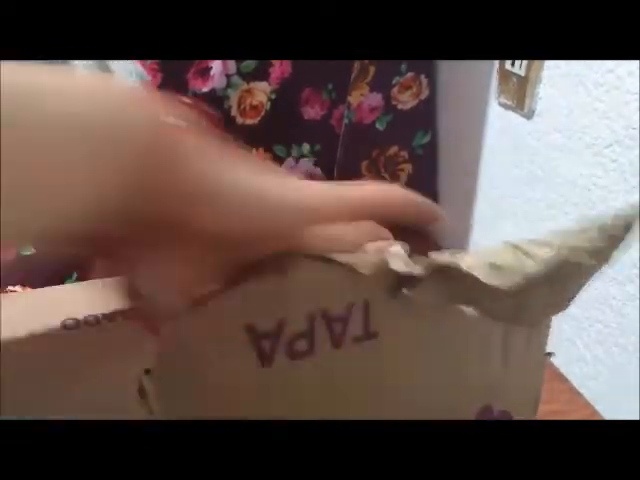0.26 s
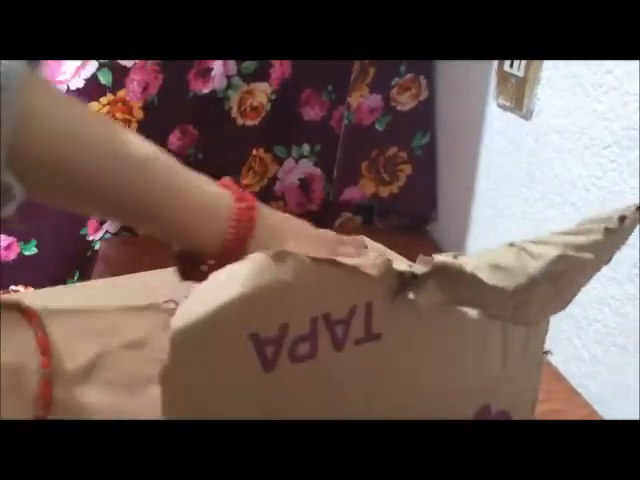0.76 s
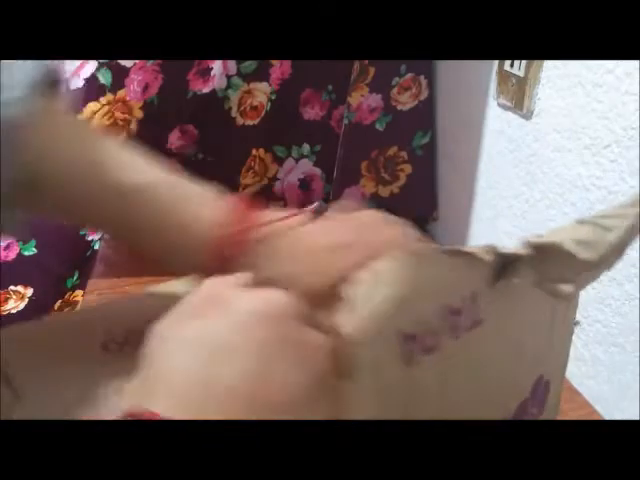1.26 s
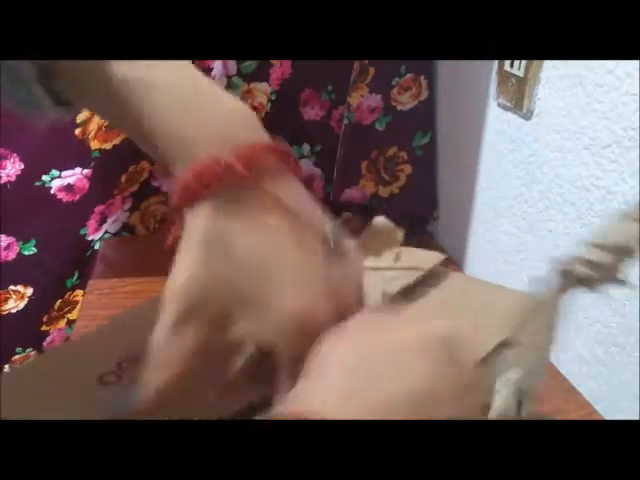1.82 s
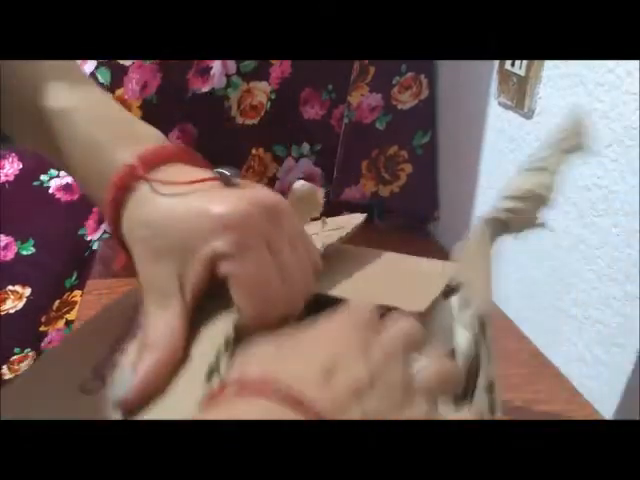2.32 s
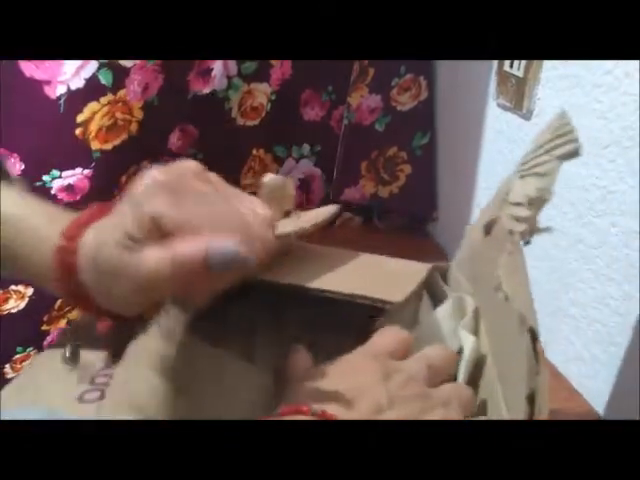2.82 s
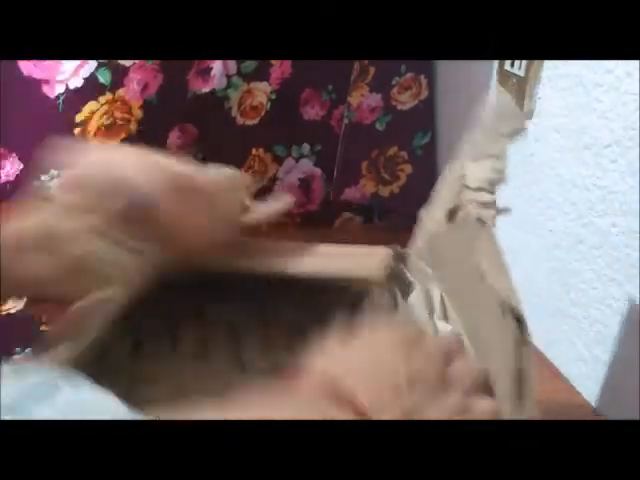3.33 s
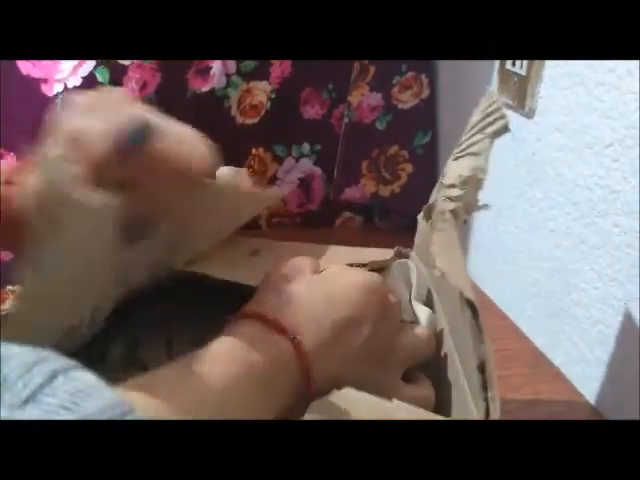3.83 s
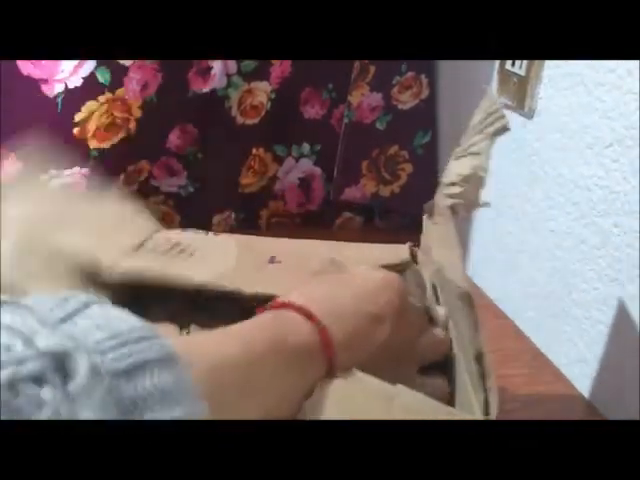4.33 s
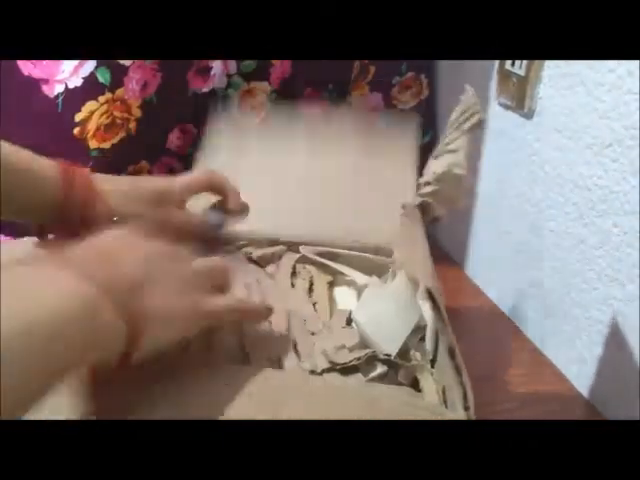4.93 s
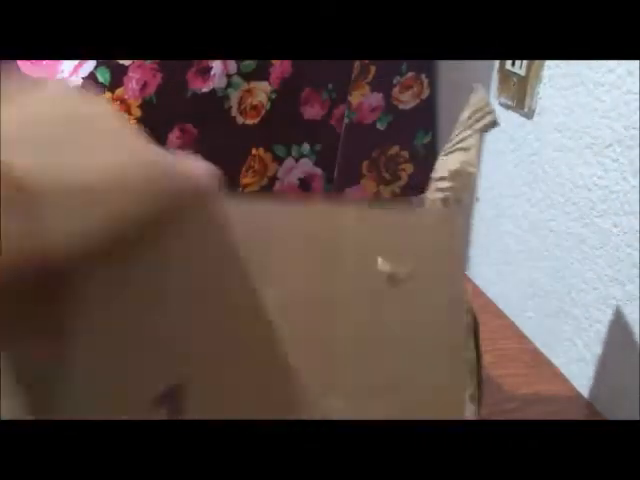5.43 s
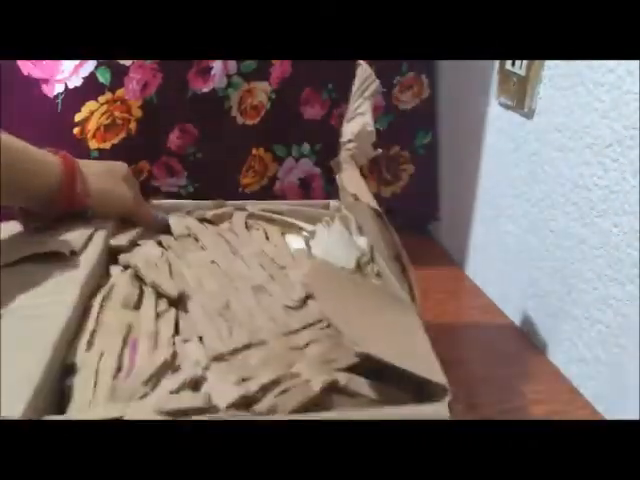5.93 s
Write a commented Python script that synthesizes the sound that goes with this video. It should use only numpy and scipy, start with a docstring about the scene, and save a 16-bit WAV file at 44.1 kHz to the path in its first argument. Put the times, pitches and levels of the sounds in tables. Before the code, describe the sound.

Close cardboard handling indoors: rough rubbing and crackling tears, a few hard snaps and boxy knocks, then softer rustling and one late click.

```python
"""Hands pull a torn cardboard box open on a table in a small room, close to a phone.
Skin and flaps slide over the board: coloured stick-slip noise that swells and fades.
Fibres and creases give way in short rips and snaps: brief bursts of filtered noise.
Flaps knock as a few swings of a panel, and the hollow box booms as a set of decaying modes.
Quiet room air and reflections lie behind; the phone widens its two microphones into stereo."""
import sys
import numpy as np
from scipy import signal
from scipy.fft import rfft, irfft, next_fast_len
from scipy.io import wavfile
from scipy.ndimage import uniform_filter1d

SR = 44100
rng = np.random.default_rng(int(sys.argv[2]) if len(sys.argv) > 2 else 0)


def master(y):
    """Save y as 16-bit WAV."""
    cut = np.clip(np.atleast_2d(y).T, -1, 1)
    pcm = np.round(cut * 32767)  # scale
    wavfile.write(sys.argv[1], SR, pcm.astype(np.int16))


N = 271637

# A hand or flap slides over the board: [t of the hardest push/s, swell/s, fade/s,
# flexing of the box level/dB, drag on the panels level/dB, surface hiss level/dB,
# brightness (sheen relative to hiss)/dB]
STROKES = [ (0.081, 0.16, 0.24, -52.5, -52.5, -55, -18), (0.262, 0.096, 0.065, -49.5, -48.5, -50, 1.5),
           (0.389, 0.039, 0.065, -46, -46.5, -53.5, 1.5), (0.53, 0.055, 0.055, -49.5, -57, -60.5, 3),
           (0.62, 0.11, 0.068, -46.5, -43.5, -51, -5.5), (0.81, 0.17, .14, -43.5, -53, -56.5, 3),
           (0.982, 0.059, 0.071, -37.5, -40, -45.5, 1), (1.17, .06, 0.043, -51, -59, -56, -10),
           (1.252, 0.068, 0.089, -41.5, -45, -48, -7), (1.39, 0.21, .06, -47.5, -47.5, -50, -0.5),
           (1.632, 0.14, 0.13, -37.5, -47, -51, -5.5), (1.91, 0.06, 0.05, -42.5, -52, -56, -1),
           (1.98, 0.047, 0.044, -47.5, -50, -55.5, -6), (2.21, 0.095, 0.066, -39, -44, -51.5, -2.5),
           (2.39, .09, .16, -47, -48, -53, -4.5), (2.62, 0.23, 0.13, -53, -56.5, -63, -2),
           (2.77, 0.17, 0.095, -51, -51.5, -58, 8), (2.848, 0.075, 0.039, -41, -40.5, -54.5, 8.5),
           (3.11, 0.065, 0.057, -68, -70, -68.5, -21), (3.28, .07, 0.078, -54.5, -59, -61.5, -7),
           (3.49, .11, 0.14, -54, -58.5, -65, -0.5), (3.63, 0.058, 0.044, -58, -51.5, -59.5, -9),
           (3.77, 0.18, 0.22, -62, -70.5, -78.5, 9), (3.92, 0.053, 0.046, -47, -50.5, -54.5, -4),
           (4.05, 0.036, .05, -63, -65, -78, -12), (4.129, 0.012, 0.025, -51, -57, -58, -2),
           (4.29, 0.18, 0.073, -59.5, -63.5, -66, -0.5), (4.39, 0.013, 0.062, -50, -61.5, -65, -9),
           (4.489, 0.024, .05, -54.5, -63, -66, -1.5), (4.6, 0.059, 0.14, -60, -64, -71.5, -4),
           (4.709, 0.036, 0.062, -55.5, -65, -65.5, -2), (4.82, 0.023, .07, -60, -64.5, -73, 1),
           (4.93, 0.12, 0.18, -54.5, -56.5, -64.5, 1), (5.261, 0.086, 0.15, -46, -47.5, -56, 4.5),
           (5.33, 0.085, 0.047, -44.5, -43.5, -38.5, -23), (5.37, 0.03, 0.049, -50, -64, -44, 1.5),
           (5.66, 0.17, 0.19, -54, -55, -57, -2.5), (5.892, 0.083, .05, -56.5, -53, -57.5, 7.5),
           (6.089, 0.12, 0.11, -52.5, -48.5, -53.5, 5)]
# Colours of the three parts of a slide: [f/Hz, level/dB]
FLEX_COLOUR = [(25, -19), (52, -12), (68, -5), (85, -3.5), (115, -6), (160, 0), (215, -8.5), (270, -4.5),
               (370, -6), (425, -2), (520, -15.5), (800, -21), (2000, -62)]
DRAG_COLOUR = [(200, -78), (520, 0.5), (720, 8), (1000, 3), (1400, 1.5), (1800, 1.5), (2300, -20),
               (3200, -12.5), (7000, -26)]
HISS_COLOUR = [(600, -7), (1600, -29), (2300, 6.5), (3100, 3.5), (4100, 0), (5100, -2), (6500, -5),
               (9000, -6), (14000, -13)]
# The finest grain of the paper, in slides and rips: [f/Hz, level/dB]
SHEEN_COLOUR = [(2500, -13.5), (5000, 1), (7500, 1), (10000, 0.5), (13000, 1.5), (14300, -7)]
# A run of breaking fibres: [t/s, crack level/dB, crack centre f/Hz, fizz level/dB,
# brightness (sheen relative to fizz)/dB, time to the peak/s]
RIPS = [ (0.0, -39, 1120, -44.5, 1.5, 0.0054), (0.455, -38.5, 1010, -44, -4, 0.0034),
        (0.47, -43, 1010, -46, 1.5, .004), (0.52, -42, 925, -61, -8, 0.00079),
        (0.9685, -25, 1180, -33, 3.5, 0.0019), (1.218, -33, 1210, -34.5, -13, 0.0021),
        (1.286, -35.5, 1160, -35, -4.5, 0.0019), (1.352, -31.5, 1300, -35.5, -2, 0.00079),
        (1.553, -34, 836, -52, -19, 0.0014), (1.623, -37, 1370, -34.5, -2.5, 0.002),
        (1.637, -28, 1680, -31.5, 3, 0.00088), (1.895, -46.5, 1190, -49, -4, 0.0053),
        (1.932, -17, 2250, -21, -14, 0.00071), (2.309, -40, 744, -70, -7, 0.0012),
        (2.847, -30, 1190, -36, 4, 0.0044), (2.868, -21.5, 1510, -21, -14, 0.0006),
        (3.092, -58, 1060, -67, -14, 0.0026), (3.392, -44.5, 930, -59, -13, 0.00097),
        (3.408, -43.5, 1000, -56.5, 1, 0.0011), (3.566, -46.5, 1030, -55, -9, 0.0014),
        (3.875, -27, 1210, -35, 5.5, 0.00075), (3.883, -39, 960, -43, 3, 0.0043),
        (3.911, -45, 1060, -42, -3.5, 0.0022), (3.9335, -45, 2760, -44.5, -2, 0.0036),
        (4.124, -54, 1350, -52, -2, 0.0031), (4.223, -45, 1030, -54.5, -4, 0.0017),
        (4.28, -47.5, 845, -69, -6, 0.0015), (4.296, -47.5, 1010, -53.5, -2, .0036),
        (4.411, -50.5, 1100, -70, -8, 0.0011), (4.694, -48.5, 1540, -74, 4, 0.0015),
        (4.807, -46, 1280, -54, -4, 0.00091), (4.9, -51, 1030, -58, 1, 0.004),
        (5.196, -43.5, 1060, -63, 8, 0.0022), (5.241, -32.5, 1290, -36.5, -5, 0.0014),
        (5.427, -39, 1080, -34.5, 0, 0.0017), (5.439, -37.5, 1230, -39.5, 1.5, .002),
        (5.7631, -19.5, 3970, -44, -1, 0.00069), (5.765, -38.5, 980, -37, -19, 0.0017)]
# Colour of the fizz at the torn edge: [f/Hz, level/dB]
FIZZ_COLOUR = [(600, -51), (2000, 7.5), (2900, 7), (3800, 3.5), (5000, 2.5), (7000, -6), (9500, -10),
               (14500, -24)]
# A panel is bumped or buckles: [t/s, panel level/dB, panel f/Hz, boom of the box level/dB,
# left-right/dB]
KNOCKS = [ (0.001, -33, 410, -36, -1.5), (0.267, -43, 158, -35.5, -0.5), (0.41, -34.5, 197, -49, -3),
          (0.461, -34, 200, -32, 1), (0.69, -36, 167, -52, 6.5), (0.801, -39.5, 212, -43, -1),
          (0.9734, -18, 410, -26.5, 5), (0.98, -24, 139, -62, -5), (1.034, -33.5, 195, -46, -6),
          (1.121, -33.5, 154, -41.5, -1), (1.216, -55, 770, -34.5, 1), (1.352, -35.5, 356, -51, 12),
          (1.556, -16, 390, -24, 6.5), (1.638, -26, 242, -20, 4.5), (1.64, -22, 704, -32.5, 13.5),
          (1.932, -11, 847, -29.5, -4), (2.073, -27.5, 123, -37, 2.5), (2.185, -29, 382, -34, -3),
          (2.807, -32.5, 392, -50, -2), (2.873, -18, 353, -22.5, -1), (3.166, -51.5, 183, -53, 1.5),
          (3.395, -37.5, 405, -41, 1), (3.875, -29, 1133, -34, -3), (3.878, -25, 372, -35.5, 6.5),
          (3.912, -32, 112, -38.5, 1), (4.036, -44, 129, -57, -1), (4.222, -30, 116, -36.5, 0.5),
          (4.298, -39, 173, -40.5, -1), (4.697, -49.5, 690, -45.5, -8), (4.807, -38.5, 686, -45.5, -6),
          (5.057, -58, 153, -43.5, -2), (5.176, -38, 290, -40, -1), (5.24, -27, 795, -36.5, -6),
          (5.429, -40.5, 246, -31, 3), (5.449, -32.5, 252, -39.5, 1), (5.763, -50.5, 410, -43, 1)]
# Modes of the hollow box at its nominal shape: [f/Hz, level/dB, t60/s]
BOX_MODES = [(82, -35, 0.061), (146.7, -1, 0.075), (165, -0.5, 0.15), (218, -6, 0.1), (255.4, 5.5, 0.055),
             (270, -15, 0.031), (351, -8, 0.12), (416.9, -0.5, 0.11), (462.5, 4, 0.022), (675, -2, 0.029),
             (842, -17.5, 0.12), (907, -15.5, 0.072)]
# Decay of the small room: [f/Hz, t60/s]
ROOM_DECAY = [(100, 0.37), (300, 0.11), (1000, 0.13), (5000, 0.11), (14000, 0.086)]
# Colour of the still room air: [f/Hz, level/dB]
AIR_COLOUR = [(25, -14), (130, 0), (300, -22.5), (1000, -8.5), (3000, -18.5), (14000, -48.5)]
# Likeness of a sound at the two microphones: [f/Hz, likeness 0-1]
MIC_LIKENESS = [(30, .1), (70, 0.54), (150, 0.92), (450, 0.63), (900, 0.3), (1500, 0.035), (3000, 0.019),
                (14000, 0.016)]
# Balance of the two channels: [f/Hz, left-right/dB]
MIC_BALANCE = [(50, -2.5), (130, 1), (280, 3.5), (550, -2), (1100, 0), (2000, 0.5), (3500, -0.5),
               (8000, 0.5), (13000, 2.5)]
# Stereo widening: [f/Hz, share of crossfeed 0-1]
WIDENING = [(350, 0.0055), (800, 0.58), (2000, 1), (4200, 0.82), (6300, 0.29), (8400, 0.12), (13000, 0.067)]
# Low cut of each microphone: [left f/Hz, right f/Hz]
LOW_CUT_HZ = (41, 79)

# a stroke is this much weaker one swell before and one fade after its push
STROKE_DROP_DB, SWELL_CURVE, FADE_CURVE = 10.5, 1.46, 1.21
# swings to the peak for a 400 Hz panel; small stiff panels swing more often
PANEL_CYCLES, STIFF_LAW = 0.88, 0.25
# harder blows crush the board, which halves the swings every so many dB
CRUSH_FROM_DB, CRUSH_HALVING_DB = -28, 25
AIR_DB = -68.5
WIDEN_DELAY_S, EDGE_HZ = 0.0004833, 14450


def sliding():
    """Stick and slip flexes the box, shakes its panels and hisses on the paper skin."""
    flex_gain, drag_gain, hiss_gain, sheen_gain = stroke_levels()
    grip = wander(hz=60)  # uneven pressure of the hand, shared by all three
    slips = catches(per_s=260, spread_db=2, smooth=1.1)
    snags = catches(per_s=520, spread_db=2, smooth=.7)
    grit = catches(per_s=1100, spread_db=3.5, smooth=1.1)

    flex = evened(colour(slips, FLEX_COLOUR)) * flex_gain * amp(2.2 * grip)
    drag = evened(colour(snags, DRAG_COLOUR)) * drag_gain * amp(1.0 * grip)
    hiss = evened(colour(grit, HISS_COLOUR)) * hiss_gain
    sheen = evened(colour(grit, SHEEN_COLOUR)) * sheen_gain
    surface = (hiss + sheen) * amp(0.93 * grip)
    return flex + shifting(drag, patchy_db=2.6) + shifting(surface, patchy_db=1.9)


def stroke_levels():
    """Strokes swell to a push and fade, adding in power: gains of flex, drag, hiss and sheen."""
    t = np.arange(0, N, 64) / SR
    power = np.zeros((4, len(t)))
    for push_s, swell, fade, flex_db, drag_db, hiss_db, bright_db in STROKES:
        before = np.maximum(push_s - t, 0) / max(swell, 1 / SR)
        after = np.maximum(t - push_s, 0) / max(fade, 1 / SR)
        away = before ** SWELL_CURVE + after ** FADE_CURVE
        push_db = np.array([[flex_db], [drag_db], [hiss_db], [hiss_db + bright_db]])
        power += amp(push_db - STROKE_DROP_DB * away) ** 2
    return [np.interp(np.arange(N) / SR, t, np.sqrt(p)) for p in power]


def catches(per_s, spread_db, smooth):
    """Fibres catch and let go: uneven clicks over the smooth noise of countless smaller ones."""
    size = amp(spread_db * np.clip(rng.standard_normal(N), -2, 2))
    happens = rng.random(N) < per_s / SR
    clicks = evened(size * happens * rng.choice([-1, 1], (2, N)))
    return evened(pair(clicks + smooth * rng.standard_normal((2, N))))


def shifting(x, patchy_db):
    """As the contact travels, the board rings at ever changing narrow resonances."""
    z = signal.stft(x, nperseg=1024)[2]
    patches = rng.standard_normal(z.shape[1:])
    patches = uniform_filter1d(patches, size=3, axis=0)  # across frequency
    patches = uniform_filter1d(patches, size=7, axis=1)  # across time
    return signal.istft(z * amp(patchy_db * evened(patches)), nperseg=1024)[1][:, :N]


def rips():
    """Bursts of fractures crack in the board and fizz at the torn edge; the shortest are snaps."""
    out, t = np.zeros((2, N)), np.arange(SR // 8) / SR
    for start_s, crack_db, hz, fizz_db, bright_db, swell in RIPS:
        u = t / max(swell, 1 / SR)
        run = (u * np.exp(1 - u)) ** .55  # the tear starts abruptly and peters out
        sizes = amp(3 * rng.standard_normal(len(t)))
        fractures = pair(run * sizes * rng.standard_normal((2, len(t))))
        crack_colour = [(hz / 6, -24), (hz / 2, -10), (hz * 0.607, -1),
                        (hz * 1.28, -2), (hz * 2, -17), (hz * 5, -42)]
        crack = evened(colour(fractures, crack_colour))
        sheen = evened(colour(fractures, SHEEN_COLOUR))
        fizz = evened(colour(fractures, FIZZ_COLOUR)) + amp(bright_db) * sheen
        run_rms = np.sqrt(np.mean(run ** 2))
        add(out, start_s, (amp(crack_db) * crack + amp(fizz_db) * fizz) * run_rms)
    return out


def knocks():
    """The struck panel swings for a few cycles; the box behind it booms a little longer."""
    out, t = np.zeros((2, N)), np.arange(SR // 3) / SR
    mode_hz, mode_db, t60 = np.transpose(BOX_MODES)[:, :, None]
    ring = amp(mode_db - 60 * t / t60) * (1 - np.exp(-t / .004))
    chance = rng.standard_normal((len(KNOCKS), 2, len(BOX_MODES), 1))
    for (start_s, db, hz, boom_db, pan_db), (shape, lag) in zip(KNOCKS, chance):
        crush = .5 ** (max(db - CRUSH_FROM_DB, 0) / CRUSH_HALVING_DB)
        cycles = PANEL_CYCLES * (hz / 400) ** STIFF_LAW * crush
        u = t * hz / cycles
        panel = u * np.exp(1 - u) * np.sin(2 * np.pi * hz * t)
        # the box changes shape in the hands
        phase = 2 * np.pi * mode_hz * (1 + 0.025 * shape) * t
        # each mode reaches the two microphones a little out of step
        boom = np.array([(ring * np.sin(phase + side * 0.22 * lag)).sum(0) for side in (1, -1)])
        sides = amp([[pan_db / 2], [-pan_db / 2]])
        add(out, start_s, (amp(db) * panel + amp(boom_db) * boom) * sides)
    return out


def room(x, first_s=0.005):
    """Scattered reflections of a small room, each band dying at its own speed."""
    shape = (2, SR // 2)
    taps = rng.standard_normal(shape) * (rng.random(shape) < 3000 / SR)
    taps *= np.arange(SR // 2) > first_s * SR  # the walls answer after the direct sound
    hz, t, z = signal.stft(taps, SR, nperseg=256)
    decay = amp(-60 * t / read(ROOM_DECAY, hz)[:, None])
    tail = signal.istft(z * decay, SR, nperseg=256)[1]
    tail = pair(tail / np.linalg.norm(tail, axis=1, keepdims=True))
    return signal.fftconvolve(x, tail, axes=1)[:, :N]


def room_air():
    """The still air of the room: steady coloured noise at both microphones."""
    return amp(AIR_DB) * evened(colour(pair(rng.standard_normal((2, N))), AIR_COLOUR))


def pair(x):
    """Two unrelated signals become a spaced microphone pair, alike mainly in the upper bass."""
    a, b = rfft(x)
    same = np.clip(read(MIC_LIKENESS, np.fft.rfftfreq(x.shape[1], 1 / SR)), 0, 1)
    return irfft([a, same * a + np.sqrt(1 - same ** 2) * b], x.shape[1])


def colour(x, points):
    """Causal minimum-phase filter with the given [f/Hz, level/dB] shape."""
    log_gain = np.log(amp(read(points, abs(np.fft.fftfreq(4096, 1 / SR)))))
    response = np.exp(np.conj(signal.hilbert(log_gain)))
    taps = np.fft.ifft(response).real[:2048]
    return signal.oaconvolve(x, taps[None], axes=1)[:, :x.shape[1]]


def wander(hz):
    """Smooth, bounded chance of rms 1, mostly slower than hz changes a second."""
    f = np.fft.rfftfreq(N, 1 / SR)
    band = f / (f + hz / 10) / (1 + (f / hz) ** 4)
    drift = evened(irfft(rfft(rng.standard_normal(N)) * band, N))
    return evened(np.tanh(drift))


def amp(db):
    """Decibels to gain."""
    return 10 ** (np.asarray(db) / 20)


def evened(x):
    """Scales to rms 1."""
    return x / np.sqrt(np.mean(x ** 2) + 1e-20)


def read(points, hz):
    """Joins [f/Hz, value] points on a log-frequency axis."""
    f, value = np.transpose(points)
    return np.interp(np.log(hz + 1), np.log(f + 1), value)


def add(mix, start_s, sound):
    """Mixes a stereo sound in at its start time."""
    part = mix[:, max(round(start_s * SR), 0):][:, :sound.shape[1]]
    part += sound[:, :part.shape[1]]


def scene():
    """The box close by, its reflections from the room, and the room air."""
    slide, rip, knock = sliding(), rips(), knocks()
    to_room = amp(-11.0) * slide + amp(-10) * rip + amp(-15.5) * knock
    return slide + rip + knock + room(to_room) + room_air()


def record(dry):
    """Low cut; widening subtracts a delayed copy of the other side; balance; then the band limit."""
    size = next_fast_len(N + SR // 10)
    low_cuts = [signal.butter(2, hz, "high", fs=SR, output="sos") for hz in LOW_CUT_HZ]
    mics = np.array([signal.sosfilt(cut, x) for cut, x in zip(low_cuts, dry)])

    hz, z = np.fft.rfftfreq(size, 1 / SR), rfft(mics, size)
    cross = np.clip(read(WIDENING, hz), 0, 1)
    delay = np.exp(-2j * np.pi * hz * WIDEN_DELAY_S)
    z = (z - cross * delay * z[::-1]) / np.sqrt(1 + cross ** 2)
    balance = amp(read(MIC_BALANCE, hz) * np.array([[.5], [-.5]]))
    wide = irfft(z * balance, size)[:, :N]

    band_limit = signal.firwin(201, EDGE_HZ, window=("kaiser", 8), fs=SR)
    return signal.oaconvolve(wide, band_limit[None], "same")


dry = scene()
out = record(dry)
master(out)
```